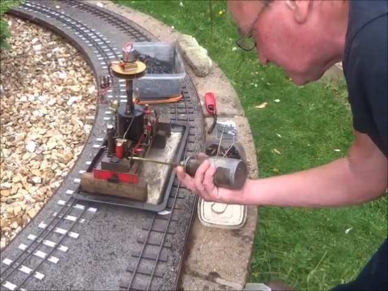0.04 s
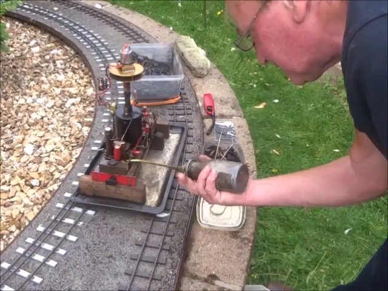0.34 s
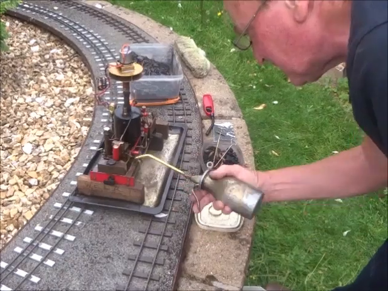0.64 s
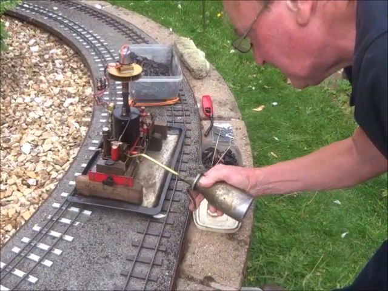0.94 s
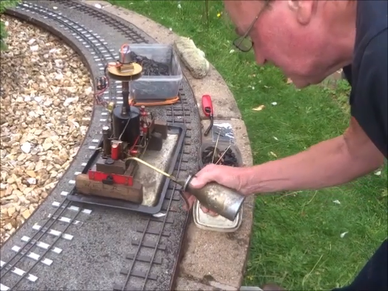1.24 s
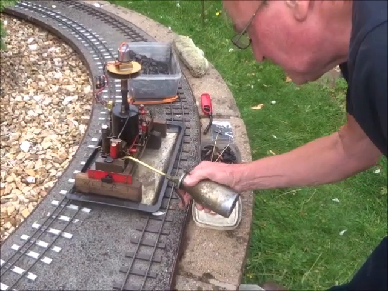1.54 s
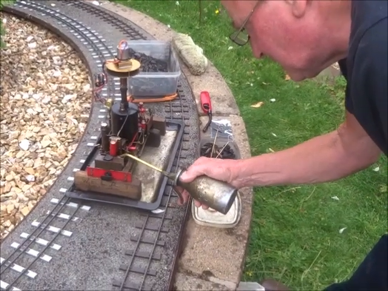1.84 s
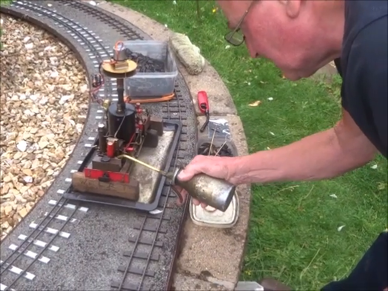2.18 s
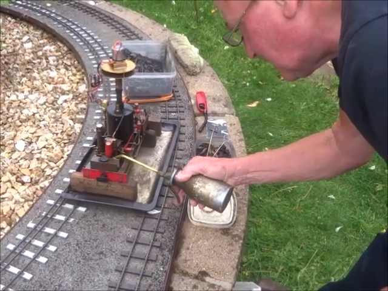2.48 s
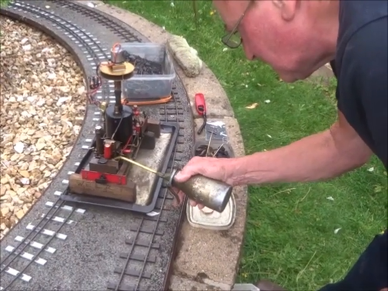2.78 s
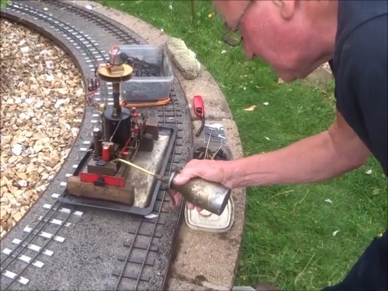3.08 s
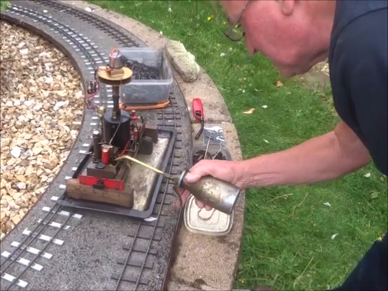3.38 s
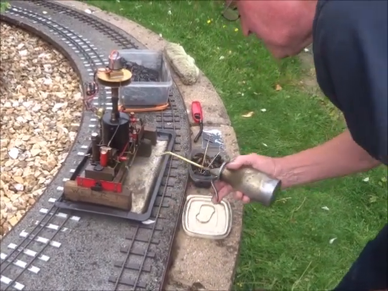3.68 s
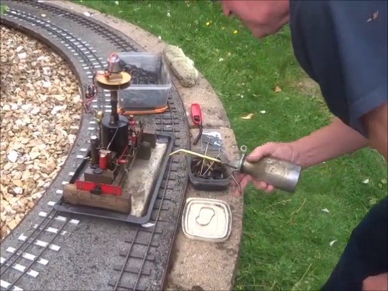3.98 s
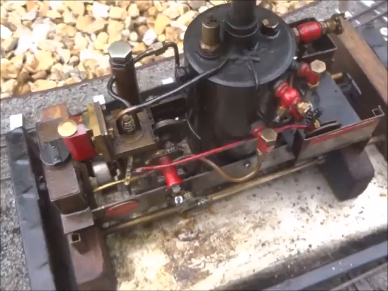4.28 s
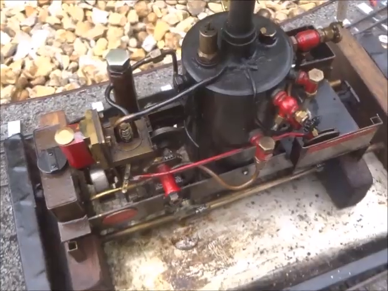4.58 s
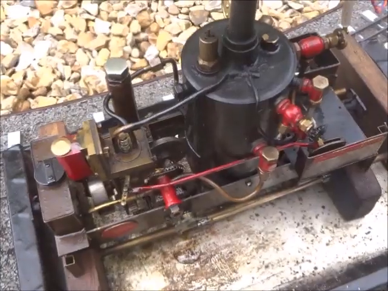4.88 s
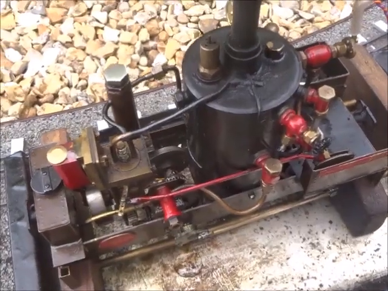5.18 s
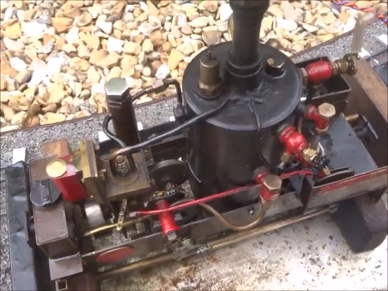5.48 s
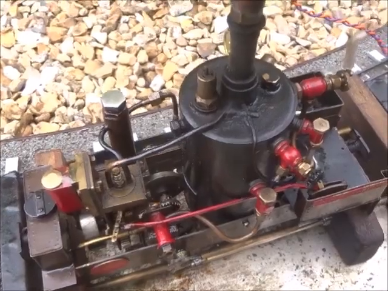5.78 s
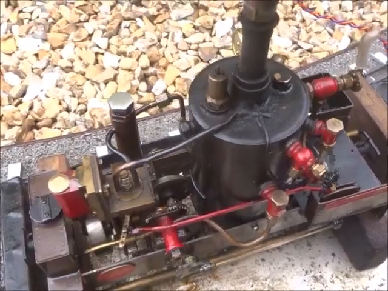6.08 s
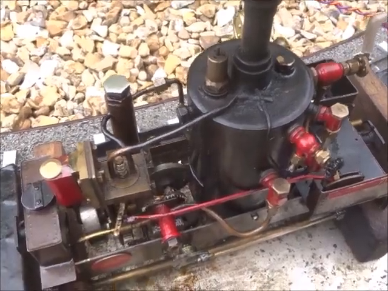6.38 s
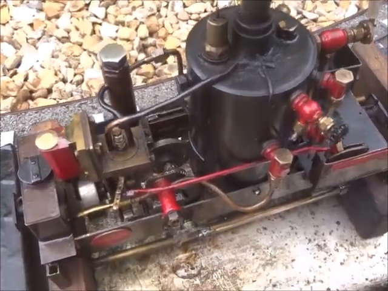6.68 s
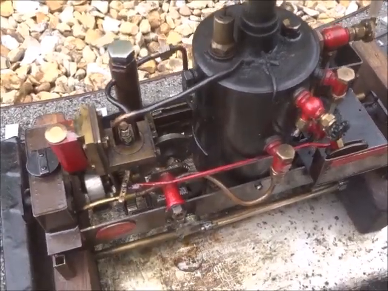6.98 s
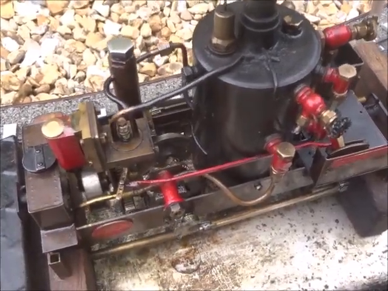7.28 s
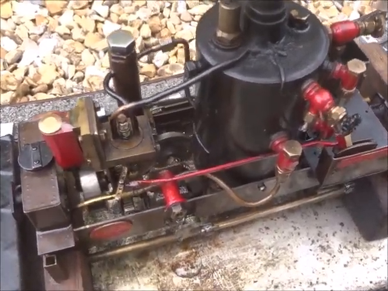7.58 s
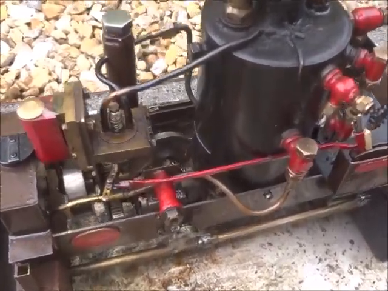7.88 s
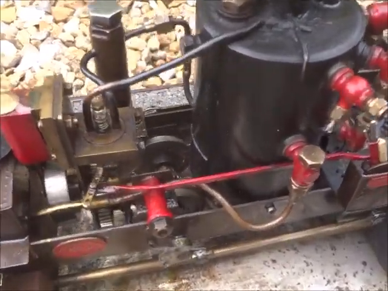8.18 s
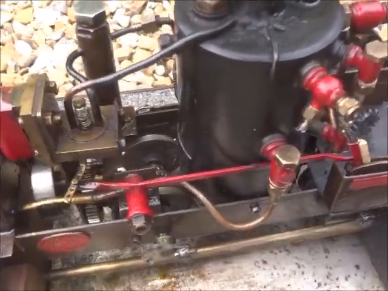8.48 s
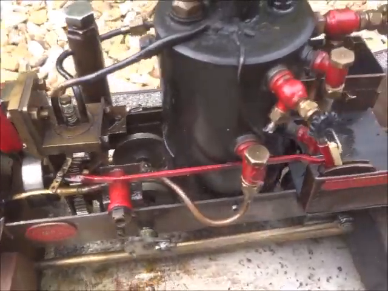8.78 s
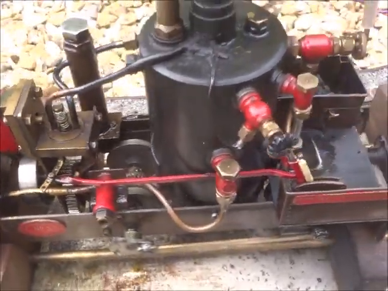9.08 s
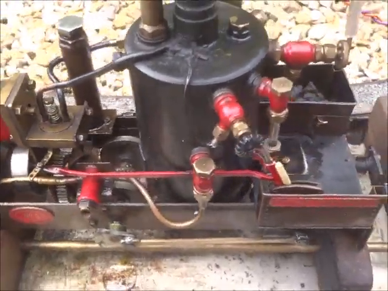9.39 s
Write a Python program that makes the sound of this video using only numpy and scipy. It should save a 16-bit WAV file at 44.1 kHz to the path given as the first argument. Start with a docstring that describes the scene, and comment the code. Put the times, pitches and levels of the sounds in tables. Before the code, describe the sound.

A small electric fan rushes and whines on a model steam locomotive's chimney, first at a distance, then much louder up close.

```python
"""An electric draught fan runs on the chimney of a model steam locomotive on a garden railway.
First, from standing height, air rushes through it with a ground reflection and the rotor hums and whines;
an oil can clicks and swishes, a low outdoor murmur dies away and the chimney whistles faintly.
From 4.3 s the fan is heard close up: the air rings the chimney, whistles at its top and rumbles in the
wake. A few handling knocks follow, and the whistle fades as the listener moves down beside the boiler."""
import sys
import numpy as np
from scipy import signal
from scipy.fft import rfft, irfft
from scipy.io import wavfile

SR = 44100
rng = np.random.default_rng(int(sys.argv[2]) if len(sys.argv) > 2 else 0)


def transcribe(u):
    """Save the signal u as a 16-bit wav file named by the first command-line argument.

    u: samples, shape (n,) or (channels, n), limited to [-1, 1]; the rate is SR.
    q: integer samples, one column per channel.
    """
    v = np.clip(np.atleast_2d(u).T, -1, 1)
    q = np.round(v * 32767).astype(np.int16)
    wavfile.write(sys.argv[1], SR, q)


N = 416744
TIME = np.arange(N) / SR
FREQ = np.maximum(np.arange(N // 2 + 1) * SR / N, 1)
CLOSE_S = 4.308  # far before, close after


def undb(db):
    """Decibels to gain."""
    return 10 ** (np.asarray(db) / 20)


def curves(table):
    """Columns of a time table, linearly interpolated."""
    times_s, *columns = np.transpose(table)
    return [np.interp(TIME, times_s, column) for column in columns]


def unit(x):
    """Scale to rms 1."""
    return x / np.sqrt(np.mean(x ** 2))


def wander(rate_hz):
    """Smooth random drift, rms 1."""
    return unit(irfft(rfft(rng.standard_normal(N)) / (1 + (FREQ / rate_hz) ** 4), N))


def spectrum_db(points):
    """Breakpoints interpolated over log frequency."""
    hz, db = np.transpose(points)
    return np.interp(np.log(FREQ), np.log(hz), db)


def bell(x, centre, width):
    """Gaussian of height 1; width is taken at half height."""
    return 2 ** -(2 * (x - centre) / width) ** 2


def noise(direct, diffuse=None, side_db=-15):
    """Coloured stereo noise, rms 1: direct sound in the mid, scattered sound in the side."""
    gains = np.array([direct, direct if diffuse is None else diffuse])
    mid, side = irfft(rfft(rng.standard_normal((2, N))) * gains, N)
    return unit(unit(mid) + undb(side_db) * unit(side) * np.array([[1], [-1]]))


# Outdoor murmur: (frequency [Hz], relative density [dB])
MURMUR_SPECTRUM = [(25, -17), (60, -7), (100, -5.5), (170, 2), (260, 5), (500, -25.5)]
# Its fade: (time [s], level [dB])
MURMUR_FADE = [(1.7, -68.5), (2.5, -84)]


def garden_murmur():
    """Low outdoor noise that dies away."""
    return noise(undb(spectrum_db(MURMUR_SPECTRUM)), side_db=-11) * undb(curves(MURMUR_FADE)[0])


# Soft noise swells: (time [s], length [s], centre [Hz], half-width [Hz], level [dB])
AIRY_SWELLS = [(0.405, 0.098, 3400, 630, -46.5), (0.745, 0.3, 2400, 450, -48.5),
               (.325, .07, 4400, 1100, -50), (2.12, .25, 3000, 2000, -53), (3.503, 0.39, 3300, 700, -54),
               (4.18, 0.19, 3060, 350, -52)]


def airy_swells():
    """Swishes of the moved can, then at 4.18 s a faint airy chimney whistle near 3 kHz."""
    return sum(noise(bell(FREQ, hz, 2 * half_width_hz)) * bell(TIME, time_s, length_s) * undb(db)
               for time_s, length_s, hz, half_width_hz, db in AIRY_SWELLS)


def strikes(events, modes, rattle, rattle_s):
    """Blows ring the modes, soft ones only the low modes, and rattle; small bodies radiate no bass."""
    out, t = np.zeros(N), TIME[:SR // 8]
    for time_s, level_db, bright_hz, pitch in events:
        ring = 0
        for hz, db, t60_s in modes:
            gain = undb(db) / np.hypot(1, (hz / bright_hz) ** 2)
            ring += gain * np.sin(2 * np.pi * hz * pitch * t) * undb(-60 * t / t60_s)
        contact = (t == 0) + rattle * rng.standard_normal(len(t)) * np.exp(-t / rattle_s)
        highpass = signal.butter(2, modes[0][0] * pitch * .8, "high", fs=SR, output="sos")
        blow = signal.sosfilt(highpass, signal.fftconvolve(ring, contact)[:len(t)])
        start = int(time_s * SR)
        out[start:start + len(t)] += undb(level_db) * blow / abs(blow).max()
    return out


# Can and spout clicks: (time [s], peak [dB], brightness [Hz], pitch [ratio])
CAN_CLICKS = [(.3325, -32.5, 3000, 1), (.3342, -26, 3200, 1), (.383, -41, 12000, 1),
              (1.415, -45, 16000, 2.2), (3.18, -44, 16000, 2.1)]
# Can modes: (frequency [Hz], gain [dB], T60 [s])
CAN_MODES = [(2640, 9, 0.022), (3670, 5, .02), (4500, 2, .022), (5470, -8, .02), (8750, -5, .01)]


def oil_can():
    """The can clicks as it is worked round the engine."""
    return strikes(CAN_CLICKS, CAN_MODES, rattle=0.19, rattle_s=0.0031)


# Knocks: (time [s], level [dB], brightness [Hz], pitch [ratio])
BODY_KNOCKS = [(4.8143, -15, 1800, .8), (5.422, -22, 6000, 1.2), (5.6049, -6, 1250, 1.026),
               (8.18, -22, 3000, 1)]
# Touch, blow and two bounces per knock: (delay [s], gain [dB], brightness [ratio])
KNOCK_CONTACTS = [(-.0016, -6.5, 7), (0, -1, 1), (.0036, -5, 6), (.012, -11, 4)]
# Camera body modes: (frequency [Hz], gain [dB], T60 [s])
BODY_MODES = [(756, -6, 0.024), (920, -1.5, 0.023), (2060, 4.5, 0.022), (2700, 1.5, 0.02),
              (3020, -13, 0.022)]


def handling_knocks(pan_db=-3.0):
    """Each knock chatters on a hand-held camera's body in four quick contacts."""
    blows = [(time_s + delay_s, db + gain_db, bright_hz * hardness, pitch)
             for time_s, db, bright_hz, pitch in BODY_KNOCKS
             for delay_s, gain_db, hardness in KNOCK_CONTACTS]
    knocks = strikes(blows, BODY_MODES, rattle=0.06, rattle_s=0.0037)
    return knocks * undb(np.array([[1], [-1]]) * pan_db / 2)


# Close path: (time [s], place [0 chimney, 1 boiler], nearness [dB], left minus right [dB])
LISTENER_PATH = [(4.5, 0, -0.4, 0), (4.9, 0.022, 0.8, -0.5), (5.6, 0.031, 0.46, 0.1),
                 (6.0, 0.0085, -.5, -.8), (6.5, .13, 0.47, -0.5), (7.5, 0.46, -0.7, -.8),
                 (8.1, 1, 0.5, -1.1), (8.42, 1, 1.25, -.8), (9.25, 0.82, -.5, -.2)]


def along_path(chimney, boiler):
    """Blend two values as the listener moves from chimney to boiler."""
    place = curves(LISTENER_PATH)[0]
    return (1 - place) * chimney + place * boiler


# Wake rumble: (frequency [Hz], relative density [dB])
WAKE_SPECTRUM = [(25, -34), (60, -19), (95, -2.5), (130, -5.5), (230, 3.5), (320, 2), (450, -13),
                 (900, -40)]


def wake_rumble(level_db=-53.5, boiler_lift_db=4.5):
    """The fan's wake rumbles, louder down by the boiler."""
    return noise(undb(spectrum_db(WAKE_SPECTRUM))) * undb(level_db + along_path(0, boiler_lift_db))


# Whistle pitch: (time [s], centre [Hz])
WHISTLE_PITCH = [(4.33, 3430), (4.51, 3650), (5.39, 3520), (5.79, 3660), (6.3, 3510), (7.53, 3570),
                 (8.4, 3350)]


def chimney_whistle(width_hz=190, level_db=-40.5, boiler_shade_db=-9.5):
    """Airy whistle at the chimney top: a narrow, gliding noise band that swells once."""
    phase = 2 * np.pi * np.cumsum(curves(WHISTLE_PITCH)[0]) / SR
    eddies = [noise(bell(FREQ, 0, width_hz), side_db=-34) for _ in range(2)]
    band = eddies[0] * np.cos(phase) + eddies[1] * np.sin(phase)
    swell_db = 3.8 * bell(TIME, centre=6.38, width=0.23)
    return band * undb(level_db + along_path(0, boiler_shade_db) + swell_db)


# Rotor tones: (harmonic [x speed], far level [dB], chimney level [dB], boiler level [dB])
ROTOR_TONES = [(1, -76, -61.5, -54), (2, -64.5, -44.5, -42.5), (3, -71, -76, -49.5), (4, -63, -60, -56.5),
               (5, -82, -59, -56), (6, -73, -51.5, -49), (16, -87, -53.5, -54), (18, -82, -57, -62),
               (21, -68.5, -52, -63), (23, -76, -49.5, -62), (33, -98, -74, -72), (34, -92, -56, -72),
               (35, -90, -60, -72), (36, -90, -81, -66), (37, -72, -72, -68), (38, -75, -81, -59),
               (39, -100, -82, -61)]


def rotor(far_hz=282.2, creep_s=(5.5, 6.7), creep_hz=(279.8, 280.25), drift_hz=0.0903, flutter_hz=0.28):
    """Hum and whine on harmonics of an uneven shaft speed: far, by the chimney, by the boiler."""
    steady_hz = np.where(TIME < CLOSE_S, far_hz, np.interp(TIME, creep_s, creep_hz))
    speed_hz = steady_hz + drift_hz * wander(1.964) + flutter_hz * wander(35)
    phase = 2 * np.pi * np.cumsum(speed_hz) / SR
    wavers = [undb(1.5 * wander(28)) for _ in range(4)]
    harmonics, *levels_db = np.transpose(ROTOR_TONES)
    tones = [np.sqrt(2) * wavers[i % 4] * np.sin(harmonic * phase + rng.uniform(0, 2 * np.pi))
             for i, harmonic in enumerate(harmonics)]
    return undb(levels_db) @ np.array(tones)


def turbulence(air_db, peaks_db, side_db, surge_db=0.28, flicker_db=0.82):
    """Rushing air: the whole flow surges while the eddies of five bands flicker independently."""
    spectrum = rfft(noise(undb(air_db + peaks_db), undb(air_db), side_db))  # scatter evens out peaks
    octaves = np.clip(np.log2(FREQ / 500), 0, 4)
    bands = (irfft(spectrum * np.maximum(1 - abs(octaves - k), 0), N) for k in range(5))
    flow = sum(band * undb(flicker_db * wander(26)) for band in bands)
    return flow * undb(surge_db * wander(3.7))


# Rush from above: (frequency [Hz], relative density [dB])
FAR_SPECTRUM = [(30, -40), (100, -28), (170, -21.5), (270, -4.5), (600, -2), (800, -1.5), (1200, 0),
                (1600, -2), (2800, -4.5), (4000, -4), (5000, -7), (5700, -12), (8600, -18), (11000, -20)]
# Ground-reflection dips and peaks: (centre [Hz], width [Hz], gain [dB])
FAR_PEAKS = [(1466, 210, -7.5), (1830, 150, 2.5), (2070, 230, -5.5), (2620, 340, 2.5), (3400, 180, -2.5),
             (4500, 200, -3.5), (5830, 330, -4.5), (6600, 450, 2.5)]
# Stereo balance: (frequency [Hz], left minus right [dB])
FAR_BALANCE = [(500, -0.4), (1400, -1.5), (2500, 0.8), (4000, 0), (6000, 3.5), (8000, 1)]


def far_rush(level_db=-44, comb_hz=1005, bounce=0.25):
    """The rush arrives directly and, 1 ms later, off the track bed, which hollows it."""
    comb_db = 20 * np.log10(abs(1 + bounce * np.exp(-2j * np.pi * FREQ / comb_hz)))
    hollow_db = sum(db * bell(FREQ, hz, width_hz) for hz, width_hz, db in FAR_PEAKS)
    air = turbulence(spectrum_db(FAR_SPECTRUM), hollow_db + comb_db, side_db=-11)
    balance = undb(np.outer([.5, -.5], spectrum_db(FAR_BALANCE)))
    return irfft(rfft(air) * balance, N) * undb(level_db)


# Rush by the chimney: (frequency [Hz], relative density [dB])
CHIMNEY_SPECTRUM = [(200, -32.5), (350, -3), (600, 0), (1300, -2.5), (2300, 0), (3800, -1.5), (4800, -4),
                    (5500, -9.5), (7500, -11), (8600, -15.5), (9600, -13), (11000, -18.5)]
# Rush by the boiler: (frequency [Hz], relative density [dB])
BOILER_SPECTRUM = [(200, -25), (370, 1.5), (650, 2), (1300, -0.5), (2300, 0), (3300, -1), (3800, -3),
                   (5200, -4.5), (5700, -8), (7000, -9), (8600, -15.5), (11000, -16)]
# Air resonances: (centre [Hz], width [Hz], gain by chimney [dB], gain by boiler [dB])
AIR_MODES = [(406, 83, 1, 4), (1055, 140, 4, 1), (1740, 150, 0, 2.5), (2320, 350, 2, 4), (2605, 72, 4, 4),
             (2780, 160, -1.5, -2.5), (3026, 240, 5, 3), (3285, 210, 1, 5.5), (3750, 280, 4.5, 1.5),
             (4240, 150, 5, -0.5), (5060, 250, 3, 1.5)]


def close_rush(chimney_db=-29, boiler_db=-28):
    """The air rings chimney and fan housing; its colour follows the listener's path."""
    peaks_db = sum(np.outer(db, bell(FREQ, hz, width_hz)) for hz, width_hz, *db in AIR_MODES)
    chimney = turbulence(spectrum_db(CHIMNEY_SPECTRUM), peaks_db[0], side_db=-15.5) * undb(chimney_db)
    boiler = turbulence(spectrum_db(BOILER_SPECTRUM), peaks_db[1], side_db=-16) * undb(boiler_db)
    return np.sqrt(along_path(0.96, 0)) * chimney + np.sqrt(along_path(0, 0.99)) * boiler


def scene(far_decay_s=0.019, close_rise_s=0.1, whistle_rise_s=0.054):
    """The far sound gives way to the close one; the whistle enters ahead of the rush."""
    far_tones, chimney_tones, boiler_tones = rotor()
    far = far_rush() + far_tones + garden_murmur() + airy_swells() + oil_can()
    _, nearness_db, pan_db = curves(LISTENER_PATH)
    close_air = (close_rush() + wake_rumble()) * undb(nearness_db)
    close = (close_air + along_path(chimney_tones, boiler_tones)) * undb([pan_db / 2, -pan_db / 2])
    since_s = np.maximum(TIME - CLOSE_S, 0)
    far *= np.exp(-since_s / far_decay_s)
    close *= 1 - np.exp(-since_s / close_rise_s)
    whistle = chimney_whistle() * (1 - np.exp(-since_s / whistle_rise_s))
    return far + close + whistle + handling_knocks()


def record(dry, cutoff_hz=10980):
    """Steep treble cut."""
    return signal.sosfilt(signal.ellip(14, .1, 80, cutoff_hz, fs=SR, output="sos"), dry)


dry = scene()
out = record(dry)
transcribe(out)
```